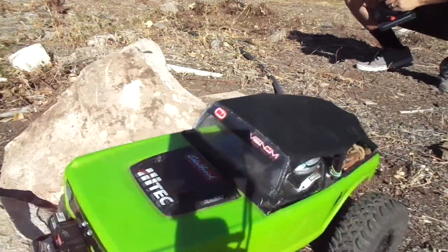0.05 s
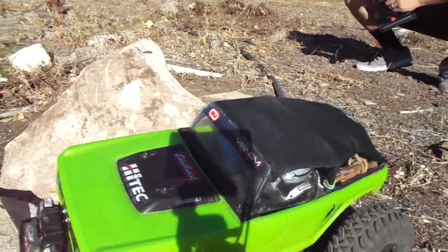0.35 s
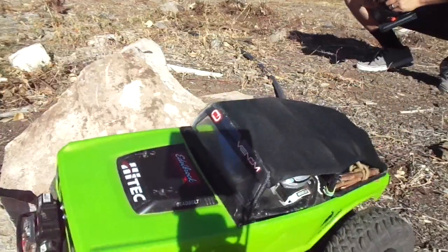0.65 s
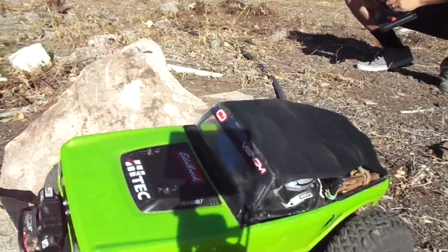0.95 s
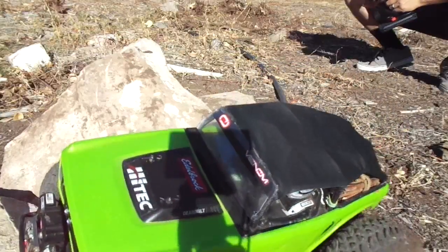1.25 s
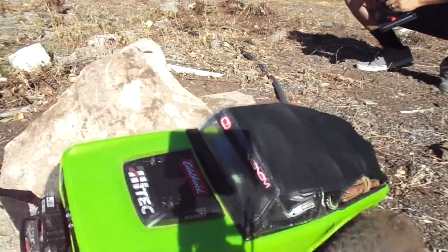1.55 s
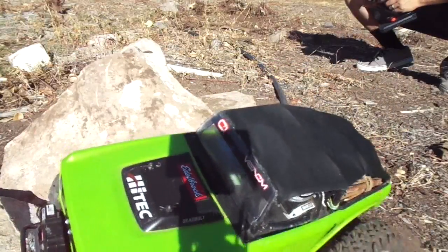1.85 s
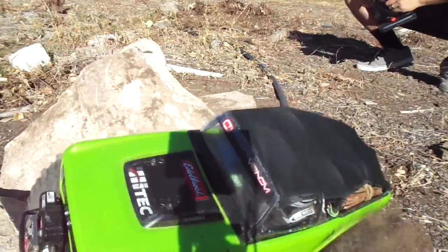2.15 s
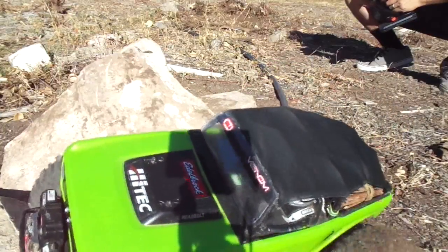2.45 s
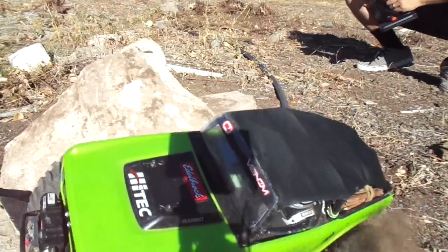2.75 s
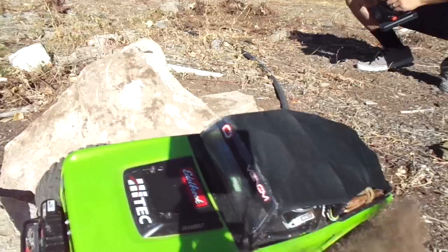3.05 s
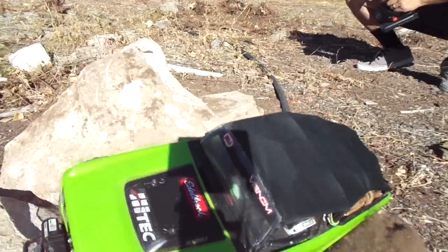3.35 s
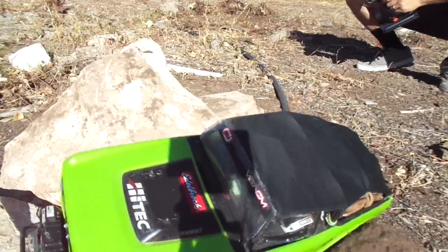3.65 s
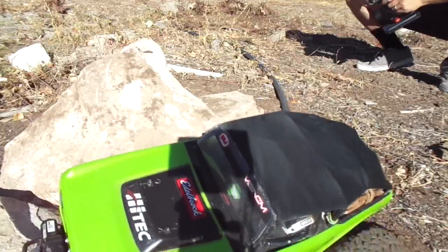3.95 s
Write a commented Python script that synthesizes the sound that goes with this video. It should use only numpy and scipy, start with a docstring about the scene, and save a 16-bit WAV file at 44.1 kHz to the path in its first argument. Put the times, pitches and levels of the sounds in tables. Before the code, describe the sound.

A small electric model truck, close up outdoors, creeps over dirt with soft bumps, plastic knocks and a faint tire squeak. From about 1 second it revs in seven short bursts, each a rising and falling gear whine with hollow tire drumming and spraying grit. From 2 to 4 seconds the bursts come louder and closer together, with knocks against rock and pebble ticks. Light wind touches the microphone throughout.

```python
"""Outdoors on dry dirt, close up: a small electric model truck, stuck on a rock, creeps and knocks,
then gets seven bursts of throttle. In each the gears whine up and down, the tire lugs drum on the
ground and make the hollow tires boom, and grit sprays. Knocks on the rock ring the plastic shell.
Almost mono, with a little wind on the microphone."""
import sys
import numpy as np
from scipy import signal
from scipy.fft import rfft, irfft
from scipy.io import wavfile
from scipy.ndimage import uniform_filter1d

SR = 44100
rng = np.random.default_rng(int(sys.argv[2]) if len(sys.argv) > 2 else 0)


def wav_record(signal):
    """Record a signal, one row per channel, as 16-bit PCM in the file named by sys.argv[1]."""
    frames = np.transpose(np.atleast_2d(signal))
    bounded = np.clip(frames, -1, 1)
    # unit amplitude maps onto the largest positive 16-bit level
    quanta = np.round(bounded * 32767).astype(np.int16)
    wavfile.write(sys.argv[1], SR, quanta)


N = 176400
T = np.arange(N) / SR

# The gears, one table per burst. Each row: time in seconds, mesh pitch in Hz, whine level in dB.
THROTTLE_BURSTS = [
    [(0.97, 275.2, -59), (1.046, 526, -43), (1.078, 627.6, -48), (1.118, 661, -43), (1.132, 688, -44.5),
     (1.18, 1016, -41), (1.21, 802, -44), (1.266, 905, -43), (1.294, 690, -46), (1.314, 599, -55),
     (1.334, 455.6, -55), (1.35, 359, -55)],
    [(1.51, 316.4, -54), (1.566, 845.6, -39.5), (1.632, 1340, -34.5), (1.656, 1248, -34),
     (1.69, 1407, -39.5), (1.718, 1054, -32), (1.736, 1112, -38), (1.772, 925, -44), (1.8, 750.0, -61),
     (1.824, 545.2, -59), (1.84, 410, -45)],
    [(2.08, 386.3, -57), (2.108, 619.6, -46), (2.148, 831.5, -42), (2.176, 1281, -40), (2.198, 1500, -34),
     (2.218, 1449, -35.5), (2.244, 1669, -31), (2.258, 1384, -40), (2.296, 1554, -36.5),
     (2.312, 1102, -35.5), (2.37, 636.7, -49), (2.4, 370.6, -43)],
    [(2.5, 378.4, -51), (2.522, 521.8, -47), (2.534, 693, -40), (2.574, 1284, -36), (2.584, 1419, -33),
     (2.608, 1309, -35), (2.634, 1786, -36), (2.642, 1673, -20.5), (2.658, 1307, -38), (2.704, 1001, -45),
     (2.734, 643, -58), (2.75, 444, -50)],
    [(2.85, 361.2, -49.5), (2.926, 1270, -34.5), (2.942, 1463, -31), (2.966, 1305, -40), (2.992, 1772, -33),
     (3.018, 1613, -30), (3.04, 1693, -30), (3.052, 1493, -27.5), (3.066, 1231, -36.5), (3.096, 1383, -35),
     (3.11, 1073, -31), (3.132, 902.3, -48), (3.16, 609, -47), (3.18, 422.5, -41)],
    [(3.23, 371.4, -54), (3.28, 1074, -35.5), (3.302, 1459, -35.5), (3.328, 1190, -33.5),
     (3.356, 1441, -38), (3.382, 1294, -32), (3.404, 1479, -35), (3.426, 1267, -33), (3.452, 1413, -40),
     (3.468, 1268, -33), (3.506, 759, -44), (3.53, 454, -40)],
    [(3.67, 357.9, -51), (3.68, 449, -49), (3.714, 845, -43), (3.726, 995.3, -34), (3.79, 1439, -35),
     (3.812, 1261, -31.5), (3.84, 1460, -38), (3.856, 1284, -29), (3.872, 1071, -27), (3.9, 888, -30.5),
     (3.924, 690.6, -47), (3.95, 423.6, -51)],
]
# The spinning tires, one table per burst. Each row: time in seconds, drumming in dB, grit in dB.
WHEELSPINS = [
    [(0.92, -53, -70), (0.94, -44, -78), (0.954, -37, -62), (0.972, -34, -66), (0.994, -40.5, -49),
     (1.008, -30, -63), (1.024, -36.5, -59), (1.21, -31, -55), (1.312, -32, -57), (1.35, -43.5, -58),
     (1.364, -54, -62), (1.42, -71, -72)],
    [(1.48, -82, -62), (1.516, -49.5, -70), (1.58, -31, -54), (1.678, -30.5, -53), (1.694, -35, -52),
     (1.708, -28.5, -48), (1.736, -29, -57), (1.756, -25.5, -50), (1.804, -30.5, -56), (1.816, -49, -50.5),
     (1.886, -59, -59), (1.9, -53, -59)],
    [(2.076, -68, -76), (2.084, -44, -76), (2.092, -46.5, -52), (2.156, -26, -62), (2.208, -36, -44.5),
     (2.282, -23, -45.5), (2.328, -39, -52), (2.35, -30.5, -46), (2.41, -46.5, -57), (2.418, -71, -76)],
    [(2.48, -66, -60), (2.498, -59, -53), (2.512, -51, -57), (2.546, -44, -50), (2.562, -31, -50),
     (2.584, -32, -51), (2.628, -26, -52), (2.636, -27.5, -45), (2.72, -27, -48.5), (2.742, -39.5, -46),
     (2.774, -46, -74), (2.8, -63, -75)],
    [(2.83, -72, -70), (2.846, -46, -55), (2.858, -61, -59), (2.884, -31, -50), (2.894, -32, -55),
     (2.964, -24.5, -46), (2.988, -31.5, -47), (3.06, -25, -44), (3.076, -27, -47), (3.098, -30.5, -50.5),
     (3.16, -42.5, -47.5), (3.21, -55, -57)],
    [(3.22, -69, -56), (3.244, -43, -57.5), (3.32, -26.5, -47), (3.34, -25.5, -51), (3.366, -29, -50),
     (3.402, -32.5, -47.5), (3.428, -28.5, -50), (3.506, -34, -46.5), (3.536, -57, -59), (3.57, -65, -60),
     (3.594, -52, -66), (3.6, -66, -49)],
    [(3.64, -78, -54.5), (3.69, -40.5, -58), (3.714, -34.5, -50), (3.828, -27.5, -48.5), (3.84, -33, -48),
     (3.882, -24.5, -42.5), (3.908, -28.5, -52), (3.922, -42.5, -57), (3.938, -34, -50), (3.946, -42, -44),
     (3.96, -52, -82), (3.99, -75, -62)],
]


def from_db(db):
    """Decibels to gain."""
    return 10 ** (np.asarray(db) / 20)


def unit_rms(x):
    """Scale to rms 1."""
    return x / np.sqrt(np.mean(x ** 2) + 1e-20)


def db_at(eq, hz):
    """Read an EQ curve on a log-frequency axis. Each row: frequency in Hz, gain in dB."""
    freqs, db = np.transpose(eq)
    return np.interp(np.log(np.maximum(hz, 1)), np.log(freqs), db)


def fader(rows, column=1):
    """Gain curve from times in seconds and one dB column, silent outside their span."""
    rows = np.array(rows)
    return from_db(np.interp(T, rows[:, 0], rows[:, column])) * (T >= rows[0, 0]) * (T <= rows[-1, 0])


def drift(rate_hz):
    """Smooth random wandering, rms 1."""
    r = np.exp(-2 * np.pi * rate_hz / SR)
    return unit_rms(signal.lfilter([1], [1, -2 * r, r * r], rng.standard_normal(N + SR))[SR:])


def colour(x, eq):
    """Apply an EQ curve as a minimum-phase filter and scale to rms 1."""
    size = 2 * N
    cepstrum = irfft(np.log(from_db(db_at(eq, np.arange(N + 1) * SR / size))))
    cepstrum[1:N] *= 2
    cepstrum[N + 1:] = 0
    return unit_rms(irfft(rfft(x, size) * np.exp(rfft(cepstrum)))[:N])


def noise(eq):
    """Coloured noise, rms 1."""
    return colour(rng.standard_normal(N), eq)


def grains(per_s, spread_db):
    """Random clicks of uneven size, rms 1."""
    sizes = from_db(spread_db * np.minimum(rng.exponential(1, N), 4))
    return unit_rms(sizes * rng.choice([-1, 1], N) * (rng.random(N) < per_s / SR))


def strikes(start_s, db):
    """One click per event."""
    out = np.zeros(N)
    out[np.clip((start_s * SR).astype(int), 0, N - 1)] = from_db(db)
    return out


def crunch(start_s, db, decay_s):
    """A quickly dying puff of noise per event."""
    envelope = signal.lfilter([1], [1, -np.exp(-1 / (decay_s * SR))], strikes(start_s, db) + 1e-18)
    return envelope * rng.standard_normal(N)


def ring(hits, modes, uneven_db=3):
    """Hits ring a set of modes, each with a strength that varies from hit to hit."""
    out = 0
    for k, (hz, db, t60) in enumerate(modes):
        r, w = np.exp(-np.log(1000) / (t60 * SR)), 2 * np.pi * hz / SR
        drive = hits * from_db(db + uneven_db * drift(55)) + 1e-18
        out = out + (-1) ** k * signal.lfilter([0, np.sin(w)], [1, -2 * r * np.cos(w), r * r], drive)
    return out


def mesh_pitch():
    """The rate at which the gear teeth meet, over time, in Hz."""
    times, hz, _ = np.vstack(THROTTLE_BURSTS).T
    return np.interp(T, times, hz)


def burst_tone(column):
    """The tone shifts as the tires dig in, gliding from the middle of one burst to the next."""
    # Each row is one burst: bite of the gear overtones in dB, pitch ratio of the tire boom.
    tones = [(6.5, 1.08), (0.5, 1.02), (0.5, 1.0), (-5, .96), (-1, .94), (-4.5, 1.06), (-3.5, 1.12)]
    middles_s = [(burst[0][0] + burst[-1][0]) / 2 for burst in THROTTLE_BURSTS]
    return np.interp(T, middles_s, np.array(tones)[:, column])


def outdoors(gust_db=4.0, wind_db=2.5, air_db=-50.5):
    """Lumpy wind on the microphone and a brief low drone over a steady hiss of air."""
    # Fader moves of wind and drone. Each row: time in seconds, level in dB.
    wind_levels = [(0.0, -44), (0.02, -40), (0.23, -57), (0.56, -38.5), (0.65, -64), (0.71, -49),
                   (1.37, -51.5), (1.39, -55.5), (2.26, -47), (2.35, -64), (3.24, -52), (3.27, -43.5),
                   (3.63, -54), (3.68, -43), (3.72, -58), (3.82, -47), (3.95, -59), (4.0, -51)]
    drone_levels = [(1.80, -60), (1.87, -50), (1.95, -67), (2.02, -44), (2.10, -42.5), (2.17, -56)]
    # Colours of wind, drone and air. Each row: frequency in Hz, gain in dB.
    wind_eq = [(20, -14.5), (35, -8), (60, -3.5), (110, -2.5), (180, -3.5), (260, -15), (500, -35),
               (1500, -60), (6000, -93)]
    drone_eq = [(60, -37), (130, -12), (170, 11), (215, -7), (300, -27), (1000, -63), (5000, -95)]
    air_eq = [(120, -2), (200, -22), (292, -13.5), (521, -0.5), (1310, -3.5), (1750, -13), (2800, -18),
              (11900, -21.5), (15000, -24.5)]
    gusts = unit_rms(noise(wind_eq) * from_db(gust_db * drift(16)))
    wind = from_db(wind_db) * fader(wind_levels) * gusts
    drone = fader(drone_levels) * noise(drone_eq)
    return wind + drone + from_db(air_db) * noise(air_eq)


def speed_controller(waver_hz=13.65):
    """The pulsed motor current sings faintly throughout."""
    # Its tones. Each row: pitch in Hz, level in dB.
    tones = [(980, -64), (1960, -67), (2940, -71), (12275, -70)]
    return sum(from_db(db) * np.sin(2 * np.pi * np.cumsum(hz + waver_hz * drift(9.6)) / SR)
               for hz, db in tones)


def squeaks(gain_db=-8, jitter=0.014):
    """Thin, high, unsteady chirps swell and fade."""
    # Each row: start in seconds, peak in dB, pitch in Hz, swell time in seconds.
    chirps = [(0.2911, -37, 13400, .0047), (1.3053, -37, 12100, 0.0057), (1.6017, -35, 13030, .004),
              (2.601, -32, 12300, 0.0044), (3.0628, -32, 13190, .0047), (3.078, -34.5, 4160, 0.012),
              (3.272, -23.5, 13200, 0.0036), (3.365, -34.5, 4073, .025)]
    waver, out = 1 + jitter * drift(300), 0
    for start_s, db, hz, swell_s in chirps:
        swell = np.exp(-np.minimum(((T - start_s) / swell_s - 1) ** 2, 20))
        out = out + from_db(db + gain_db) * swell * np.sin(2 * np.pi * np.cumsum(hz * waver) / SR)
    return out


def tire_squeal(rough_db=3, third_db=-7, jitter=0.0468):
    """Rubber briefly sticks and slips on the rock with an unsteady pitch."""
    # The squeal's path. Each row: time in seconds, pitch in Hz, level in dB.
    glide = [(.385, 1314, -64), (0.416, 1420, -50), (0.451, 1510, -45), (0.484, 1220, -52),
             (.52, 1213, -53)]
    times, pitch, _ = np.transpose(glide)
    hz = np.interp(T, times, pitch) * (1 + jitter * drift(300))
    phase = 2 * np.pi * np.cumsum(hz) / SR
    tone = np.sin(phase) + from_db(third_db) * np.sin(3 * phase)
    return fader(glide, column=2) * from_db(rough_db * drift(120)) * tone


def suspension():
    """The body settles onto its springs and tires with soft bumps."""
    # The bumps. Each row: start in seconds, level in dB.
    bumps = [(0.023, -26), (.053, -23), (0.138, -30), (0.194, -32), (.336, -28.5), (0.536, -35),
             (0.556, -41)]
    # The sprung body's modes. Each row: frequency in Hz, gain in dB, t60 in seconds.
    body_modes = [(111, -2, 0.063), (154, -2.5, 0.043), (222, -3.5, 0.039)]
    start_s, db = np.transpose(bumps)
    return ring(strikes(start_s, db), body_modes, uneven_db=0.5)


def pebbles(gain_db=-6.5, decay_s=0.00068):
    """Each flung pebble ticks at a pitch of its own."""
    # Each row: start in seconds, level in dB, ring in Hz.
    ticks = [(0.2211, -24, 8900), (0.3615, -22.5, 6050), (1.3434, -22, 8500), (1.893, -30, 9430),
             (1.9925, -24, 7300), (2.496, -24.5, 9520), (2.8427, -27, 7964)]
    out = 0
    for start_s, db, hz in ticks:
        tick = crunch(np.array([start_s]), db + gain_db, decay_s)
        out = out + signal.lfilter(*signal.iirpeak(hz, Q=1.2, fs=SR), tick)
    return out


def gravel(gain_db=-22.5):
    """Stones crack against the plastic shell and ring it briefly."""
    # Hits on the shell. Each row: start in seconds, level in dB.
    hits = [(1.268, -30), (1.695, -29), (2.240, -20.5), (2.266, -26), (2.392, -28), (2.618, -24),
            (2.737, -25), (2.911, -29), (3.049, -28), (3.067, -24), (3.855, -31)]
    # The shell's modes as stones ring it. Each row: frequency in Hz, gain in dB, t60 in seconds.
    stone_modes = [(1820, -0.5, 0.01), (2370, -0.5, 0.0049), (3330, -2, 0.0046), (4251, -6.5, 0.0033)]
    start_s, db = np.transpose(hits)
    return ring(crunch(start_s, db + gain_db, decay_s=0.004), stone_modes)


def grit(gain_db=1, clump_db=2):
    """Clumps of sand and dust fly off the tires."""
    # The spray's colour. Each row: frequency in Hz, gain in dB.
    spray_eq = [(800, 8.5), (2000, 6.5), (4000, 3.5), (6000, 0), (9000, 2.5), (13000, -1.5), (15500, -11.5)]
    sand = grains(per_s=1800, spread_db=2)
    dust = rng.standard_normal(N)
    spray = colour((sand + dust) * from_db(clump_db * drift(63)), spray_eq)
    return from_db(gain_db) * spray * sum(fader(spin, column=2) for spin in WHEELSPINS)


def creep(gain_db=-1, rub_share=0.9):
    """Slowly turning tires grind over dirt before the first burst."""
    # The grind's fader moves. Each row: time in seconds, level in dB.
    grind_levels = [(0, -35), (.1, -49), (.25, -47), (.37, -44), (.44, -40), (.52, -44), (.58, -46),
                    (.66, -48.5), (.73, -45), (.79, -47.5), (.86, -42), (.89, -49), (.95, -46.5)]
    # Its colour. Each row: frequency in Hz, gain in dB.
    grind_eq = [(120, -19), (220, -5.5), (350, -1.5), (520, -2), (680, -5), (1000, -4.5), (1500, -11),
                (1900, -14.5), (3000, -24), (4600, -25.5), (14000, -33.5)]
    contacts = grains(per_s=450, spread_db=3.5) + rub_share * rng.standard_normal(N)
    return from_db(gain_db) * fader(grind_levels) * colour(contacts, grind_eq)


def chassis_knocks(thud_db=-12.5, thud_below_hz=895, crack_db=-0.5, crack_hz=(1300, 4500), send_db=-11):
    """The chassis hits rock: a cushioned thud and a hard crack both ring the shell."""
    # The knocks. Each row: start in seconds, level in dB, brightness in dB.
    knocks = [(0.041, -31, -33), (0.057, -30, -7.5), (0.157, -32.5, -5), (0.222, -29.5, -7.5),
              (0.361, -29.5, -13), (0.539, -27, -11.5), (0.587, -21.5, -39), (0.614, -26.5, -36),
              (0.756, -21.5, -41), (0.805, -19.5, -31), (0.846, -25, -17), (0.971, -18.5, -28),
              (1.006, -20.5, -32), (1.252, -30, -14), (1.302, -14, -42), (1.819, -40, -1),
              (2.456, -34, -7.5), (2.566, -17, -16.5), (2.618, -16, -17), (2.644, -24, -32),
              (2.968, -20, -11), (3.054, -20, -18), (3.242, -28, -16), (3.519, -30, -10),
              (3.933, -23.5, -24.5)]
    # Modes of the plastic shell and chassis. Each row: frequency in Hz, gain in dB, t60 in seconds.
    shell_modes = [(357, 0, 0.034), (504, 5.5, 0.024), (653, 1.5, 0.049), (836, -1, 0.018),
                   (1110, -11, 0.054), (1370, 2, 0.011), (1920, -21, 0.0045), (2430, -35, 0.027)]
    start_s, db, bright_db = np.transpose(knocks)
    cushion = signal.butter(2, thud_below_hz, fs=SR, output="sos")
    thud = signal.sosfilt(cushion, strikes(start_s, db + thud_db) + 1e-18)
    crack_band = signal.butter(1, crack_hz, "band", fs=SR, output="sos")
    crack = signal.sosfilt(crack_band, crunch(start_s, db + bright_db + crack_db, decay_s=0.0047))
    return crack + ring(thud + from_db(send_db) * crack, shell_modes, uneven_db=1.5)


def lug_slaps(meshes_per_slap=11, jitter=0.3):
    """Big lugs hit the ground roughly in step with the wheel speed, each with its own force."""
    slaps_per_s = mesh_pitch() / meshes_per_slap * (1 + jitter * drift(100))
    count = np.floor(np.cumsum(slaps_per_s) / SR)
    return unit_rms(np.diff(count, prepend=0) * rng.standard_normal(N))


def tires(gain_db=-1, lugs_per_s=900, spread_db=3.5, rub_share=0.76, boom_db=-1, flutter_db=1.7):
    """Lugs scrub the ground, and their slaps make the hollow tires and wheel wells boom."""
    # The scrub's colour. Each row: frequency in Hz, gain in dB.
    scrub_eq = [(60, -34), (150, -21.5), (230, -3.5), (330, -4.5), (500, 0), (700, -2.5), (1000, -10.5),
                (1450, -10), (2000, -20.5), (2700, -25), (4000, -28), (6000, -32.5), (14000, -47)]
    # Modes of the tires and wells. Each row: base frequency in Hz, gain in dB, t60 in seconds.
    hollow_modes = [(294, -2, 0.047), (380.3, 1.5, 0.051), (458, -1.5, 0.064), (584, -2, 0.025)]
    scrub = colour(grains(lugs_per_s, spread_db) + rub_share * rng.standard_normal(N), scrub_eq)
    blows = grains(lugs_per_s, spread_db) + lug_slaps()
    boom = unit_rms(ring(blows * from_db(flutter_db * drift(46)), hollow_modes))
    playhead = np.cumsum(burst_tone(column=1)) % N  # varispeed bends the boom from burst to burst
    boom = np.interp(playhead, np.arange(N), boom)
    drumming = unit_rms(scrub + from_db(boom_db) * boom)
    return from_db(gain_db) * drumming * sum(fader(spin) for spin in WHEELSPINS)


def gears(whine_db=0.5, rattle_db=-10, rough_db=3.8, rasp_db=-10.5, jitter=0.01):
    """Rough harmonics of the mesh pitch sweep through fixed resonances; loose teeth rattle along."""
    # The whine's harmonics. Each row: multiple of the mesh pitch, level in dB.
    harmonics = [(1, 0.5), (2, 2), (3, 0.5), (4, -1.5), (5, -5.5), (6, 0.5), (7, -3)]
    # How gearbox and chassis pass the whine. Each row: frequency in Hz, gain in dB.
    gearbox_eq = [(300, -33), (650, -10), (1000, 2.5), (1200, -2.5), (1450, 5), (1750, -3.5), (2100, -10),
                  (2350, -10), (2650, -10), (3100, -21.5), (3700, -17.5), (4200, -13), (5000, -18),
                  (5900, -16), (6800, -26.5), (12000, -52)]
    pinion_teeth, buzz_depth = 12, 0.4  # the level pulses with each turn of the pinion
    bite_above_hz, bite_db_per_octave, full_speed_hz = 2200, 5, 1150  # overtones grow with speed
    coast_db, coast_below_hz = -6, 1230  # the whine weakens as the unloaded gears run down
    pitch = mesh_pitch()
    hz = pitch * (1 + jitter * drift(90))
    phase = 2 * np.pi * np.cumsum(hz) / SR
    bite_db = burst_tone(column=0) + bite_db_per_octave * np.minimum(np.log2(pitch / full_speed_hz), 0)
    whine = 0
    for k, db in harmonics:
        buzz = 1 + buzz_depth * np.cos(phase / pinion_teeth + 2 * np.pi * rng.random())
        roughness = unit_rms(buzz * from_db(rough_db * drift(43.5))) + from_db(rasp_db) * drift(280)
        gain = from_db(db + db_at(gearbox_eq, k * hz) + bite_db * (k * hz > bite_above_hz))
        whine = whine + gain * roughness * np.sin(k * phase)
    coasting = (np.gradient(pitch) < 0) & (pitch < coast_below_hz)
    whine *= from_db(whine_db + coast_db * uniform_filter1d(coasting.astype(float), size=1300))
    tooth_clicks = grains(per_s=1900, spread_db=0.5) * (1 + np.cos(phase))
    rattle = from_db(rattle_db) * colour(tooth_clicks, gearbox_eq)
    return (whine + rattle) * sum(fader(burst, column=2) for burst in THROTTLE_BURSTS)


def scene(side_hiss_db=-83):
    """Everything sits in the centre; only a trace of hiss differs between the ears."""
    drive = gears() + tires() + creep() + tire_squeal()
    truck = drive + chassis_knocks() + suspension() + squeaks() + speed_controller()
    centre = truck + grit() + gravel() + pebbles() + outdoors()
    return centre + from_db(side_hiss_db) * rng.standard_normal(N) * np.array([[1], [-1]])


def record(dry, cutoff_hz=15300):
    """A steep low-pass takes off the very top."""
    return signal.sosfilt(signal.ellip(12, .2, 80, cutoff_hz, fs=SR, output="sos"), dry)


dry = scene()
out = record(dry)
wav_record(out)
```